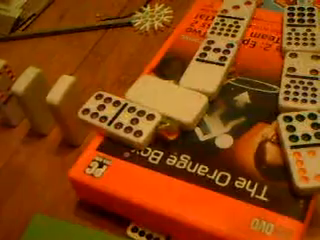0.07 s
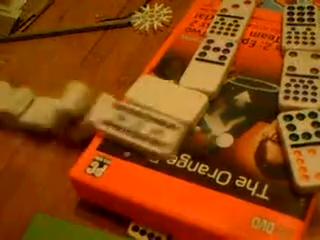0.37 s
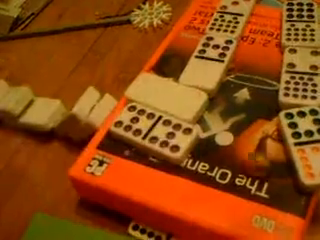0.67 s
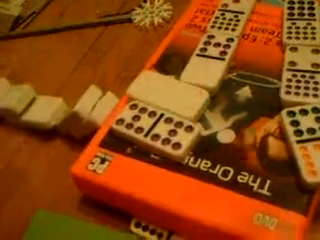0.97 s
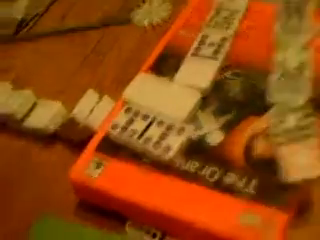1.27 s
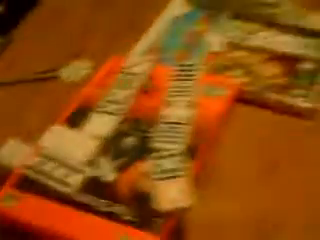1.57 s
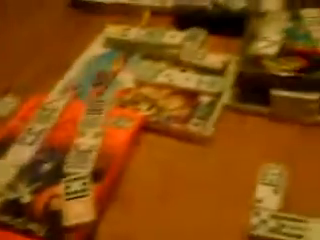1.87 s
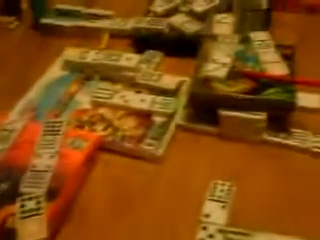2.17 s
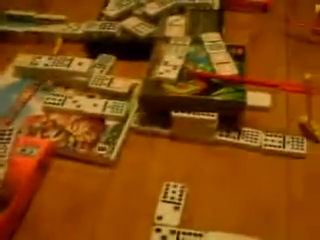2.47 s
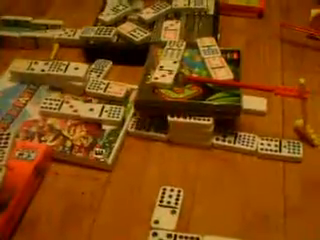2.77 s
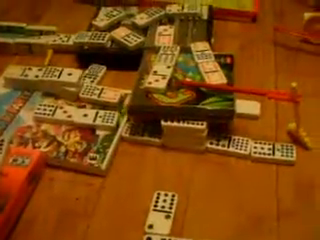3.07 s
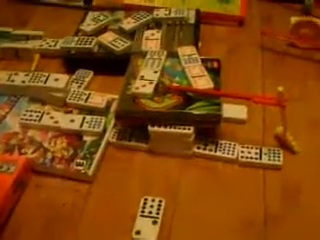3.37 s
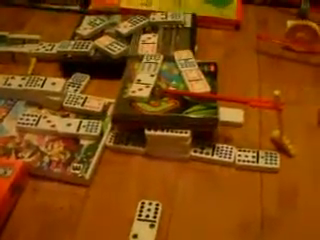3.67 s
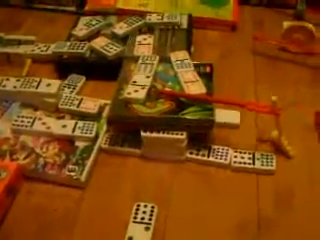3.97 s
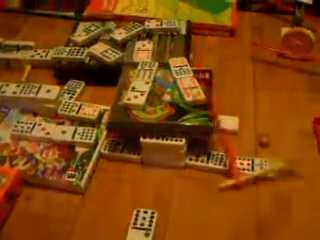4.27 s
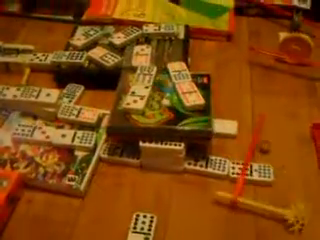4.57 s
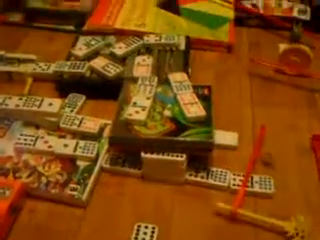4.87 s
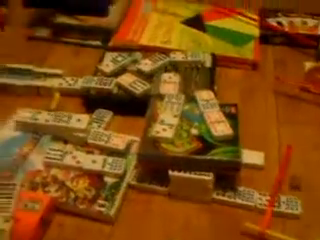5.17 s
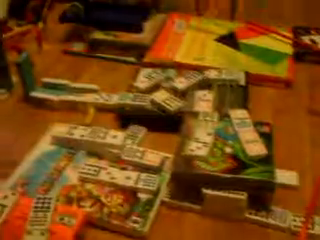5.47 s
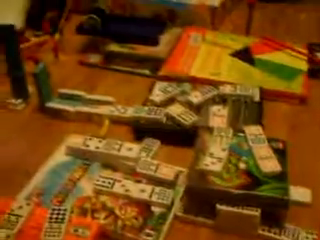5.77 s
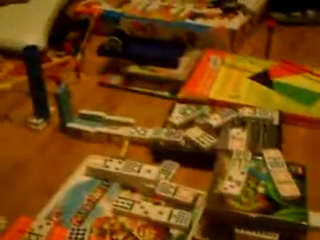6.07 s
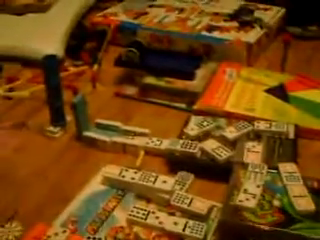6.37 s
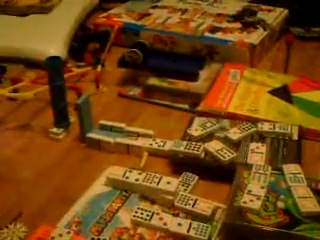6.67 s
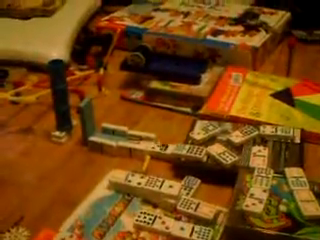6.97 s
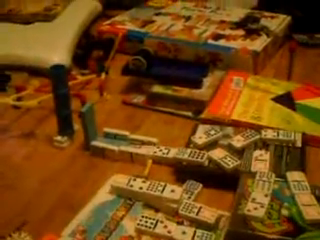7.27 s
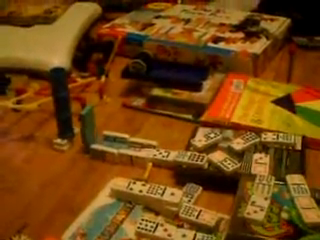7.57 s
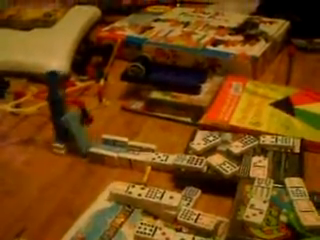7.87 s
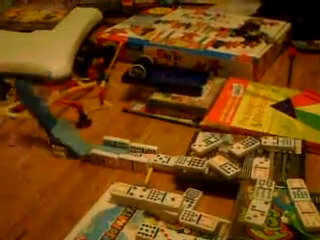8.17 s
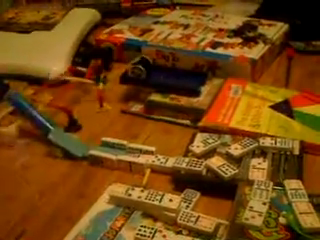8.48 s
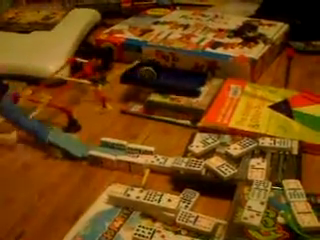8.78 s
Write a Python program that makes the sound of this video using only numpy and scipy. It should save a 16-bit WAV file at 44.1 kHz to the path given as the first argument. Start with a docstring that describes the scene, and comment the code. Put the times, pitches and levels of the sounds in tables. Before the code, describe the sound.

A quick run of sharp domino clacks, close enough to overload the microphone, starts a chain reaction on a wooden table. Much more quietly, a marble rumbles over hollow cases with soft thuds, then knocks on the tabletop and sets plastic rods clicking. A few faint ticks follow before distant dominoes fall and a tall plastic piece rattles down. A low room hum lies under it all.

```python
"""A chain reaction on a wooden table in a small, softly humming room.
First, dominoes topple right beside the microphone and overload it; a hollow case booms under them.
A marble rolls on with a low drumming, knocks over hollow plastic cases, then drops to the table
and trips plastic rods. After about seven seconds more dominoes fall, farther off.
Last, they tip over a tall plastic piece, which clatters down."""
import sys
import numpy as np
from scipy import signal
from scipy.fft import rfft, irfft, next_fast_len
from scipy.io import wavfile

SR = 44100
rng = np.random.default_rng(int(sys.argv[2]) if len(sys.argv) > 2 else 0)


def materialize(psi):
    """Save the field psi as 16-bit PCM at rate SR to the path in sys.argv[1].

    A 1-D psi becomes a single channel; in a 2-D psi each row is a channel.
    """
    bounded = np.clip(np.atleast_2d(psi).T, -1, 1)
    quanta = np.round(bounded * 32767).astype(np.int16)
    wavfile.write(sys.argv[1], SR, quanta)


N = 398223
TIME = np.arange(N) / SR

# The room's steady noise. Each row: pitch in Hz, relative level in dB.
NOISE_SHAPE = [(15, -33), (25, -5.5), (92, -7), (124, -8), (145, -11.5), (221, -13), (251, -14.5),
               (284, -16.5), (532, -20), (588, -20.5), (948, -25), (1070, -27.5), (1450, -28), (10000, -35),
               (13000, -39.5), (22000, -120)]
# The room's echo. Each row: pitch in Hz, fade time (seconds to drop 60 dB), relative level in dB.
ROOM_TAIL = [(200, 0.32, -2), (800, 0.28, -0.5), (2440, 0.28, 1), (4975, 0.29, -0.5), (8500, 0.2444, -2.5),
             (11506, 0.32, -1.5)]

# The tones each object gives off beside its main ring; the dominoes' three lowest tones are the hollow case
# booming beneath them. Each row: pitch in Hz, level in dB compared with the main ring, fade time in seconds.
DOMINO_TONES = [(251, -11.5, 0.018), (411, -9, 0.017), (775, -8.5, 0.026), (1450, -10.5, 0.011),
                (2086, -11.5, 0.0089), (2544, -12.5, .014), (5080, -18, 0.019), (6630, -12, 0.013),
                (7163, -8.5, .012), (8450, -2, 0.025), (9180, -5.5, 0.02014)]
CASE_TONES = [(262, -9.5, 0.063), (410, -9, 0.045), (505, -23, 0.027), (810, -27, 0.06), (1470, -29, 0.015)]
TABLE_TONES = [(590.5, -7.5, 0.051), (771, 0.5, 0.024), (1526, -52, .014), (2140, 5.5, 0.015),
               (3265, -27.5, 0.028), (4730, 1, 0.02), (5930, -1, 0.014), (1293, -6.5, 0.014),
               (1720, -4, 0.02), (2450, -0.5, 0.015)]
PLASTIC_TONES = [(643, -5, 0.016), (2200, -13, 0.014), (5100, -0.5, 0.0055), (7000, 0, 0.0039),
                 (8090, -5, 0.01), (9130, -11.5, 0.023)]
TOWER_TONES = [(922, -31, 0.04), (2210, 2.5, 0.0068), (2590, -1.5, 0.01), (6100, -10, 0.0077),
               (7260, -14, 0.0059), (8950, -14, 0.027)]

# The hits. A harder hit is brighter: each pitch range gains its hardness over the range below.
# Each row: start in seconds, strength in dB, hardness in dB, pitch of the main ring in Hz.
NEAR_DOMINO_HITS = [(.321, -36, -1, 8340), (.412, -13, 3.5, 8600), (.4695, -10.5, 6.5, 8100),
                    (.4755, -4, 1.5, 8010), (.5115, -5, -1, 8090), (.515, -15, 3.5, 8070),
                    (.548, -3.5, -1, 8670), (.5535, -1, 2.5, 8350), (.577, -11.5, 1.5, 8300),
                    (.583, -6.5, -1, 8400), (.595, -2, 1.5, 8390), (.6015, -1.5, 4, 8660),
                    (.612, -1.5, -3, 8390), (.616, -8, -1.5, 8450), (.6225, -8.5, 0, 8460),
                    (.634, -13.5, 2.5, 8200), (.64, -9.5, 2, 8300), (.668, -19.5, -1, 8650),
                    (.673, -6.5, 6, 8450), (.6865, -12.5, 5.5, 8700), (.702, -19, -1.5, 8450),
                    (.708, -16.5, 13, 8500)]
CASE_HITS = [(.595, -22.5, -5, 403), (.616, -19.5, -2, 374), (.66, -20, -4, 339), (.687, -23.5, 6, 214),
             (1.208, -46.5, -15, 394), (1.293, -42.5, -15, 396), (1.426, -34, -20, 397),
             (1.442, -34.5, -15, 393), (1.583, -34, -1.5, 442), (1.911, -39, 5.5, 515),
             (2.217, -34, 1, 529), (2.239, -35, 2, 550), (2.332, -38.5, 3, 630), (2.343, -39, -13, 600),
             (3.105, -45, -8, 575), (3.4, -42.5, 5, 773), (3.412, -50.5, 1, 804), (3.731, -46, 9, 560),
             (7.134, -45, 6, 555)]
TABLE_HITS = [(.6595, -10, -2, 1976), (.6865, -18.5, -5, 800), (1.999, -35.5, -3, 1603),
              (4.197, -37.5, 3, 684), (4.205, -35, 2.5, 825), (4.228, -38.5, -1.5, 856),
              (4.324, -44, 1, 1105), (4.448, -27, 0, 840), (4.645, -43, 4, 824), (4.679, -23.5, 3, 1155),
              (4.93, -42, -11, 1150), (4.969, -41.5, 2.5, 1080), (5.004, -36, -8, 1660),
              (5.037, -25.5, -4.5, 1800), (5.08, -45, 6, 2180)]
SHORT_TICKS = [(.4085, -42, -1, 8850), (.8245, -30.5, 2, 2200), (1.693, -45, -5.5, 6700),
               (2.03, -45.5, -4.5, 989), (2.359, -28.5, -1.5, 5900), (3.466, -31, 2.5, 6535),
               (3.555, -42.5, -2, 6960), (3.624, -51, -2.5, 2480), (3.668, -44, 0.5, 5120),
               (3.706, -50, -6, 5020), (3.812, -55, 1.5, 5510), (3.848, -54.5, -2, 5500),
               (4.465, -37, -7, 4370), (4.567, -28.5, 5, 8590), (4.602, -44, -3, 4240),
               (4.712, -22, 6.5, 9170), (4.753, -36, 16, 5100), (4.778, -41.5, 1, 8500),
               (5.139, -47, 3, 5550), (5.662, -43.5, 2.5, 2430), (6.113, -36, 0, 7030),
               (6.733, -39.5, 0, 6700), (6.926, -43, 0.5, 6700), (8.507, -31.5, 0.5, 6170),
               (8.543, -42, -5.5, 3290), (8.584, -38.5, 0, 2300), (8.653, -45, 3.5, 2420),
               (8.683, -44, -2, 6340), (8.936, -43, 0, 1540), (8.944, -40.5, -4, 1840)]
FAR_DOMINO_HITS = [(7.189, -20, 2.5, 8140), (7.4415, -26.5, -0.5, 9360), (7.475, -32, 3, 8700),
                   (7.488, -45, -1, 9200), (7.531, -38.5, -4, 8700), (7.542, -40, -6, 8200),
                   (7.615, -44, -11, 8850), (7.751, -46, -11, 8050), (7.805, -52.5, -10, 8400)]
TOWER_HITS = [(7.831, -33, 2.5, 5120), (7.86, -39, 1, 4970), (8.074, -31.5, 3, 2375),
              (8.12, -41, 6.5, 2310), (8.144, -42.5, -10, 2305), (8.307, -31.5, -1, 5100),
              (8.347, -42.5, -4, 2330), (8.38, -31, 1, 2420), (8.405, -37, 1, 2200),
              (8.419, -32.5, 3, 2320), (8.426, -54, -5, 2450), (8.44, -33, 1.5, 2440),
              (8.464, -35.5, -4, 2460), (8.483, -38.5, 1, 5100), (8.496, -30, 2.5, 2450),
              (8.625, -39.5, -10, 2510), (8.638, -40.5, -9, 2370)]

# Low rumbles: a hollow case booming under the falling dominoes, then the marble's runs.
# Each row: start, rise and fall in seconds, level in dB, pitch of the surface in Hz.
RUMBLES = [(.57, 0.032, 0.37, -37, 355), (.72, .12, 0.027, -42.5, 388), (1.16, 0.32, 0.5, -44, 390),
           (1.62, 0.17, .55, -50.5, 520), (2.23, 0.13, .06, -44, 670), (3.03, 0.065, .14, -53.5, 620),
           (3.14, 0.099, 0.099, -51.5, 606), (3.33, .09, 0.039, -48.5, 790), (3.5, .25, 0.94, -70, 627),
           (4.35, 0.55, 0.18, -47.5, 1030), (5.039, 0.011, .08, -42, 1100)]
# Loose parts jostling as something collapses. Each row: start, rise, hold and fall in seconds,
# level in dB, top of the chatter in Hz.
JOSTLES = [(.5, 0.069, 0.13, 0.023, -19, 8500), (7.432, 0.012, 0.093, 0.12, -38.5, 3670),
           (8.336, 0.12, 0.04, .2, -42.5, 7500), (8.551, 0.064, 0.16, .1, -49, 5240),
           (8.781, 0.031, 0.042, .07, -48, 4430), (8.926, 0.015, .012, .09, -40.5, 3800)]

# The edges of four pitch ranges: thud, knock, clack and click.
RANGE_EDGES_HZ = [180, 1200, 3000, 6500, 12000]
RANGE_FILTERS = [signal.butter(4, edges, "band", fs=SR, output="sos")
                 for edges in zip(RANGE_EDGES_HZ, RANGE_EDGES_HZ[1:])]
# The tone colour of a hit of ordinary hardness. Each lists thud, knock, clack and click in relative dB.
NEAR_COLOUR, FAR_COLOUR = (-23.5, -13, -8.5, 0.5), (-31, -13, 3, 3)
CASE_COLOUR, TABLE_COLOUR = (-0.5, -11.5, -25, -39), (2, 4.5, 0, -7)
TICK_COLOUR, TOWER_COLOUR = (-13, -4.5, 0, -2), (-4, 2, -1.5, -11)


def gain(db):
    """Turns decibels into a number to multiply a sound by."""
    return 10 ** (np.asarray(db) / 20)


def normalize(sound):
    """Scales a sound to an average (rms) level of 1."""
    return sound / np.sqrt(np.mean(sound ** 2) + 1e-20)


def read_curve(hz, points_hz, values):
    """Reads between the points of a curve, giving each octave equal space."""
    return np.interp(np.log(hz + 1), np.log(points_hz), values)


def add(mix, start_s, sound):
    """Adds a sound to the mix at its start time."""
    part = mix[round(start_s * SR):][:len(sound)]
    part += sound[:len(part)]


def background(noise_db=-49.5, hum_hz=117.2, hum_db=-55):
    """Steady room rumble, microphone hiss and an electrical hum."""
    size = next_fast_len(N)
    hz = np.fft.rfftfreq(size, 1 / SR)
    shape = gain(read_curve(hz, *np.transpose(NOISE_SHAPE)))
    noise = irfft(rfft(rng.standard_normal(size)) * shape, size)[:N]
    hum = np.sin(2 * np.pi * hum_hz * TIME)
    return gain(noise_db) * normalize(noise) + gain(hum_db) * normalize(hum)


def room(sound, build_s=0.0011, ceiling_s=0.024, ceiling_db=-9):
    """Many echoes blur into a fading tail, with one clear echo from the ceiling."""
    hz, t, spectrum = signal.stft(rng.standard_normal(SR // 2), SR, nperseg=256)
    fade_s, db = (read_curve(hz, np.transpose(ROOM_TAIL)[0], column)[:, None]
                  for column in np.transpose(ROOM_TAIL)[1:])
    tail = signal.istft(spectrum * gain(db - 60 * t / fade_s), SR, nperseg=256)[1]
    tail *= 1 - np.exp(-(TIME[:len(tail)] / build_s) ** 2)
    tail /= np.linalg.norm(tail)
    tail[round(ceiling_s * SR)] += gain(ceiling_db)
    return signal.oaconvolve(sound, tail)[:N]


def swell(rise_s, hold_s, fall_s, depth_db=21):
    """A movement's loudness: it climbs by depth_db, holds, then drops that much every fall_s."""
    t = np.arange(0, rise_s + hold_s + 2 * fall_s, 1 / SR)
    rising = np.maximum(1 - t / rise_s, 0)
    falling = np.maximum(t - rise_s - hold_s, 0) / fall_s
    return gain(-depth_db * (rising + falling))


def resonate(sound, hz, width_hz):
    """Makes a sound ring around one pitch; a narrower width rings longer."""
    turn = np.exp(2j * np.pi * np.cumsum(np.full(len(sound), hz)) / SR)
    decay = np.exp(-np.pi * width_hz / SR)
    return 2 * (turn * signal.lfilter([1 - decay], [1, -decay], sound / turn + 1e-18)).real


def strike(tones, crack_db, crack_fade_s, scuff, contact_s=0.0003, detune=0.012, scatter_db=2):
    """One contact: the object rings and cracks, from a clean snap (scuff 0) to a gritty burst (1)."""
    t = TIME[:2560]
    hz, db, fade_s = np.transpose(tones)[:, :, None]
    pitch_shift, level_shift, phase = rng.standard_normal((3, len(tones), 1))
    pitch_shift[0] = level_shift[0] = 0  # the first tone is steady; the rest depend on where it is hit
    waves = np.sin(2 * np.pi * hz * (1 + detune * pitch_shift) * t + np.pi * phase)
    rings = gain(db + scatter_db * level_shift - 60 * t / fade_s) * waves
    press = 1 - np.exp(-t / contact_s)  # the force builds while the faces meet
    burst = press * gain(crack_db - 60 * t / crack_fade_s) * rng.standard_normal(len(t))
    snap = np.linalg.norm(burst) * signal.unit_impulse(len(t), round(contact_s * SR))
    return press * rings.sum(0) + np.sqrt(scuff) * burst + np.sqrt(1 - scuff) * snap


def range_levels(strength_db, hardness_db, ring_hz, colour, ring_lift_db=4):
    """Shares a hit's strength among the four ranges, favouring the one with the main ring."""
    step = np.arange(len(colour))
    holds_ring = step == np.searchsorted(RANGE_EDGES_HZ, ring_hz) - 1
    db = np.array(colour) + hardness_db * step + ring_lift_db * holds_ring
    return strength_db + db - 20 * np.log10(np.linalg.norm(gain(db)))


def play_hits(rows, tones, colour, ring_fade_s, damping, crack_db, crack_fade_s, scuff, contact_s,
              room_db, room_crack_db, band_hz):
    """Strikes an object once for each row and adds the room's echo."""
    direct, to_room = np.zeros((2, N))
    attack = round(SR * 0.01)  # the first 10 ms set a hit's level
    # Small things give off no bass, soft contacts no treble.
    band = signal.butter(3, band_hz, "band", fs=SR, output="sos")
    for start_s, strength_db, hardness_db, ring_hz in rows:
        # ring_fade_s holds at 1000 Hz; damping makes higher rings die sooner.
        body = [(ring_hz, 0, ring_fade_s / (ring_hz / 1000) ** damping)] + tones
        facing = strike(body, crack_db, crack_fade_s, scuff, contact_s)
        # The room hears the hit from all sides at once, so its share is more even.
        all_round = strike(body, crack_db + room_crack_db, crack_fade_s, 0, contact_s)
        pair = signal.sosfilt(band, [facing, all_round])
        parts = [signal.sosfilt(sos, pair) for sos in RANGE_FILTERS]
        parts = [part / np.std(part[:, :attack], axis=1, keepdims=True) for part in parts]
        levels = range_levels(strength_db, hardness_db, ring_hz, colour)
        hit = sum(gain(db) * part for db, part in zip(levels, parts))
        add(direct, start_s, hit[0])
        add(to_room, start_s, hit[1])
    return direct + gain(room_db) * room(to_room)


def jostling_pieces(clicks_per_s=1100, kinds=6, low_hz=2200):
    """Fallen pieces slide and chatter on each other in several kinds of small click."""
    out = np.zeros(N)
    for start_s, rise_s, hold_s, fall_s, db, top_hz in JOSTLES:
        motion = swell(rise_s, hold_s, fall_s)[:SR]
        touches = rng.standard_normal((kinds, SR)) * (rng.random((kinds, SR)) < clicks_per_s / kinds / SR)
        chatter = np.zeros(len(motion))
        for taps in touches:
            click = strike(PLASTIC_TONES, crack_db=4.2, crack_fade_s=0.013, scuff=0.4, detune=0.16)
            add(chatter, 0, signal.oaconvolve(taps[:len(motion)], click))
        band = signal.butter(2, [low_hz, top_hz], "band", fs=SR, output="sos")
        add(out, start_s, gain(db) * motion * normalize(signal.sosfilt(band, chatter)))
    return out


def surface_rumbles(bumps_per_s=700, width_share=0.45, grit_db=-22, grit_hz=380):
    """Tiny bumps drum on a surface: a case booms under the dominoes, then the marble rolls."""
    out = np.zeros(N)
    for start_s, rise_s, fall_s, db, hz in RUMBLES:
        motion = swell(rise_s, 0, fall_s)[:3 * SR]
        bumps = (rng.standard_normal(3 * SR) * (rng.random(3 * SR) < bumps_per_s / SR))[:len(motion)]
        body = normalize(resonate(resonate(bumps, hz, width_share * hz), hz, 2 * width_share * hz))
        grit = normalize(resonate(resonate(bumps, 1.12 * hz, 1400), 1.3 * hz, 1800))
        grit *= (hz / grit_hz) ** 3 * gain(grit_db)  # a stiffer surface sounds grittier
        add(out, start_s, gain(db) * motion * normalize(body + grit))
    return out


def short_ticks():
    """Short, dry ticks: small hard parts touching, and one quick echo of a table knock."""
    return play_hits(SHORT_TICKS, PLASTIC_TONES, TICK_COLOUR, ring_fade_s=0.00922, damping=0,
                     crack_db=6, crack_fade_s=0.0051, scuff=1, contact_s=0.00018,
                     room_db=-8, room_crack_db=7, band_hz=(501, 10500))


def case_bumps():
    """Dominoes and the marble bump hollow cases, which answer with a low thud."""
    return play_hits(CASE_HITS, CASE_TONES, CASE_COLOUR, ring_fade_s=0.028, damping=0.42,
                     crack_db=-23, crack_fade_s=0.021, scuff=0.51, contact_s=0.00061,
                     room_db=-8.5, room_crack_db=-4, band_hz=(217, 6000))


def table_knocks():
    """Dominoes, marble and rods knock on hard surfaces."""
    return play_hits(TABLE_HITS, TABLE_TONES, TABLE_COLOUR, ring_fade_s=0.034, damping=0.84,
                     crack_db=8, crack_fade_s=0.017, scuff=0.99, contact_s=0.0002,
                     room_db=-7, room_crack_db=1.5, band_hz=(520, 10100))


def falling_tower():
    """The tall plastic piece is struck, falls and rattles."""
    return play_hits(TOWER_HITS, TOWER_TONES, TOWER_COLOUR, ring_fade_s=0.029, damping=0,
                     crack_db=-10, crack_fade_s=0.02, scuff=1, contact_s=0.00018,
                     room_db=-5, room_crack_db=15.5, band_hz=(472, 10800))


def far_dominoes():
    """Dominoes fall across the table, so much of their sound arrives as echo."""
    return play_hits(FAR_DOMINO_HITS, DOMINO_TONES, FAR_COLOUR, ring_fade_s=0.073, damping=0.57,
                     crack_db=9.5, crack_fade_s=0.0064, scuff=1, contact_s=0.0008,
                     room_db=-3, room_crack_db=2.5, band_hz=(496, 10170))


def near_dominoes():
    """Dominoes hit each other beside the microphone: loud, bright and with little echo."""
    return play_hits(NEAR_DOMINO_HITS, DOMINO_TONES, NEAR_COLOUR, ring_fade_s=0.078, damping=0.557,
                     crack_db=-4, crack_fade_s=0.016, scuff=0.88, contact_s=0.00033,
                     room_db=-14.5, room_crack_db=5.5, band_hz=(166.4, 9320))


def scene(room_db=-13.5):
    """The whole chain reaction and the room around it, in one channel."""
    hits = near_dominoes() + far_dominoes() + case_bumps() + table_knocks()
    hits += short_ticks() + falling_tower()
    movement = surface_rumbles() + jostling_pieces()
    return (hits + movement + gain(room_db) * room(movement) + background())[None]


def record(dry, silent_s=0.31, overload=0.92, top_hz=11750):
    """The microphone opens after a moment, clips the loudest clacks and loses the highest treble."""
    clipped = np.clip(dry * (TIME > silent_s), -overload, overload)
    treble_cut = signal.firwin(161, top_hz, window=("kaiser", 7), fs=SR)
    return signal.oaconvolve(clipped, treble_cut[None], "same")


dry = scene()
out = record(dry)
materialize(out)
```